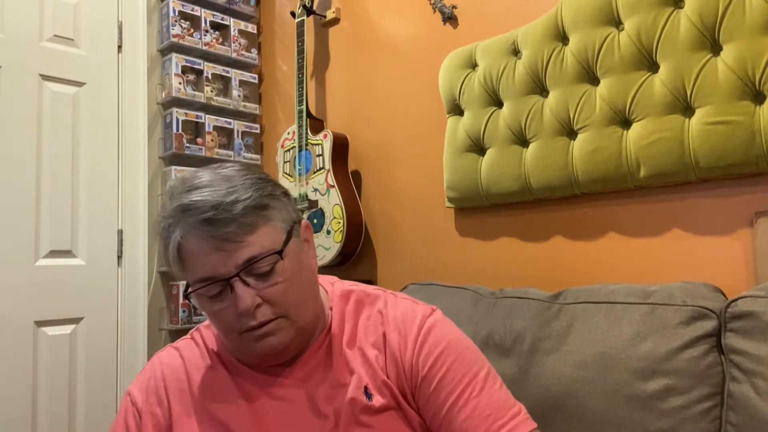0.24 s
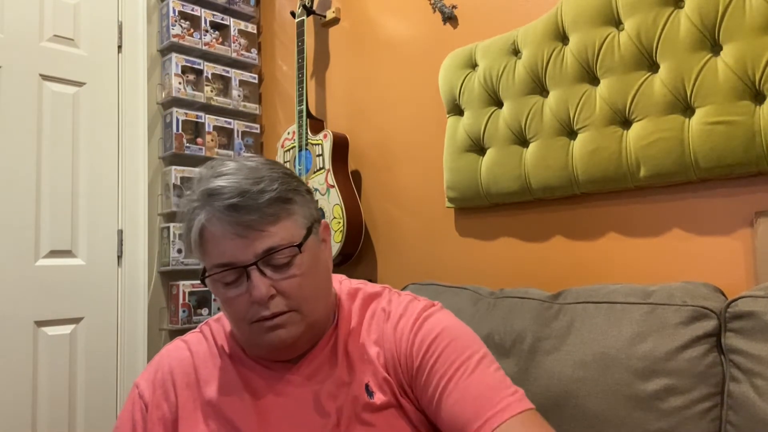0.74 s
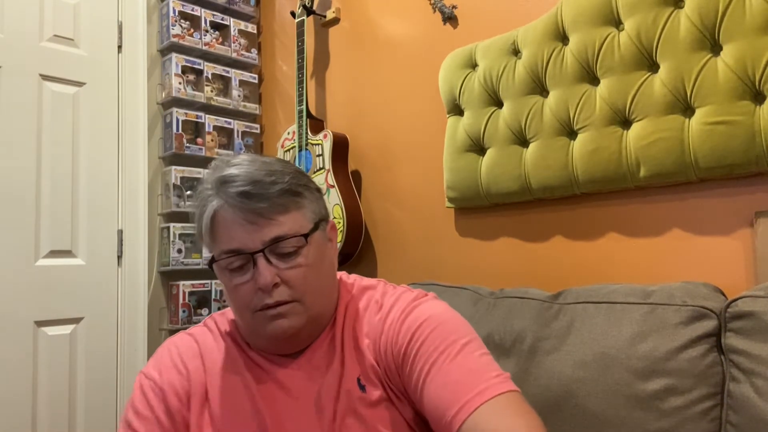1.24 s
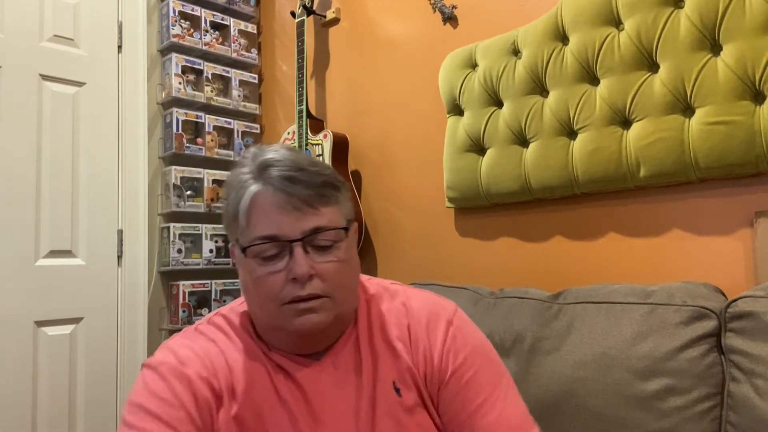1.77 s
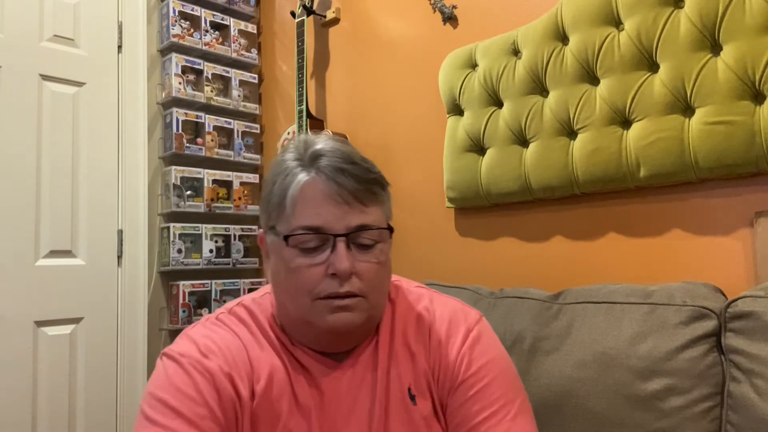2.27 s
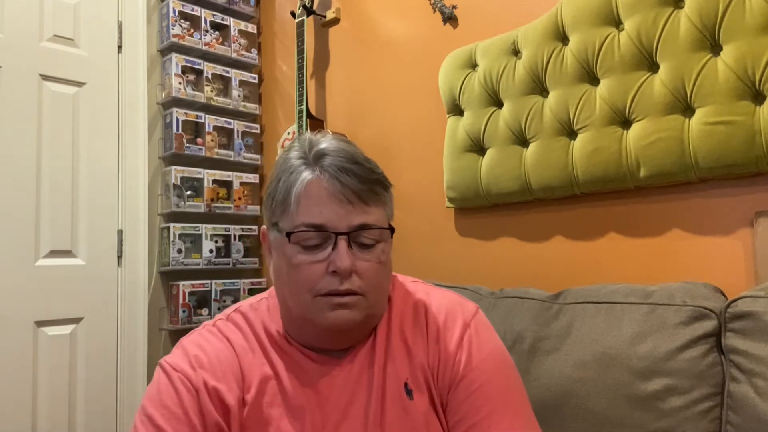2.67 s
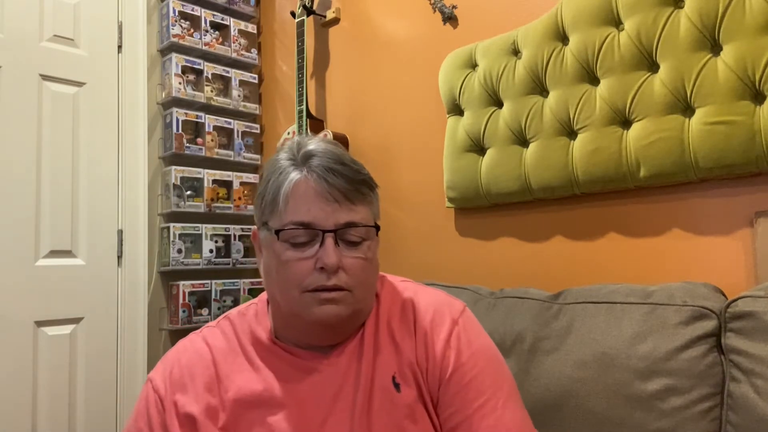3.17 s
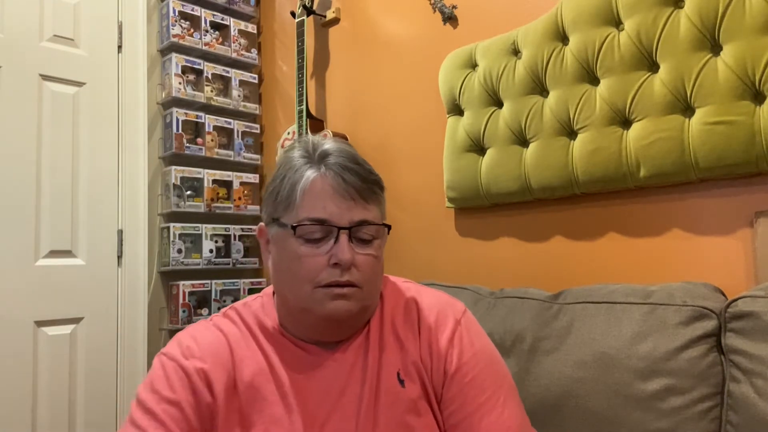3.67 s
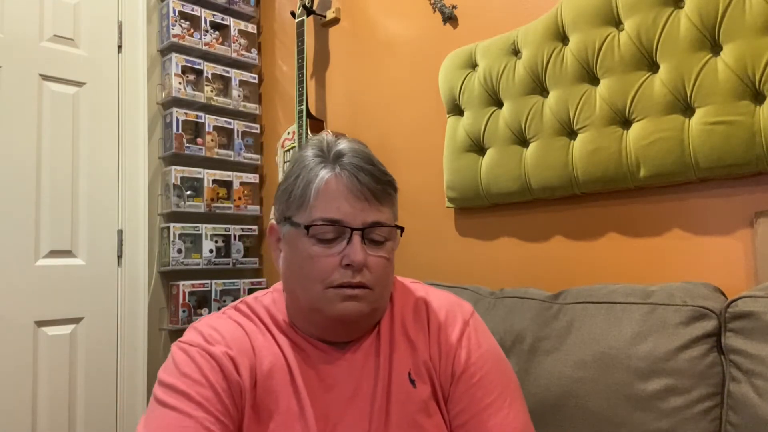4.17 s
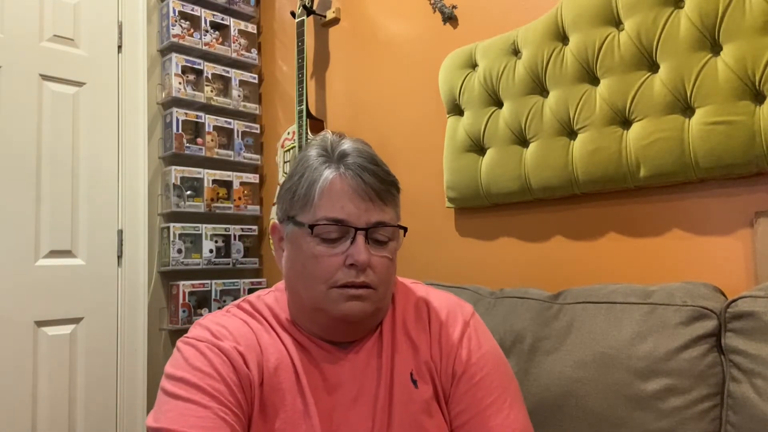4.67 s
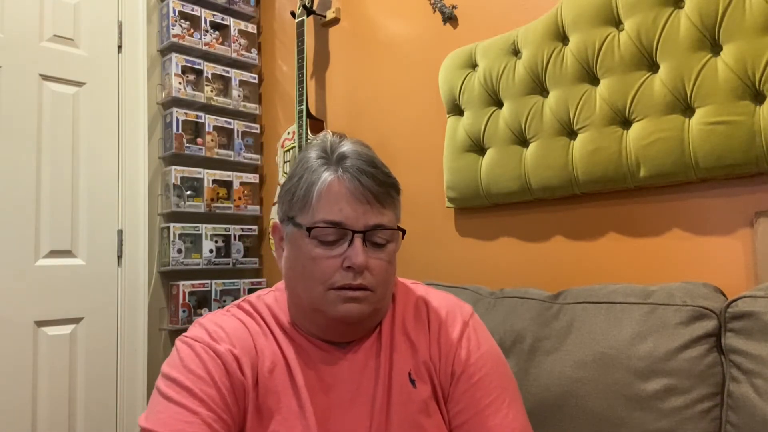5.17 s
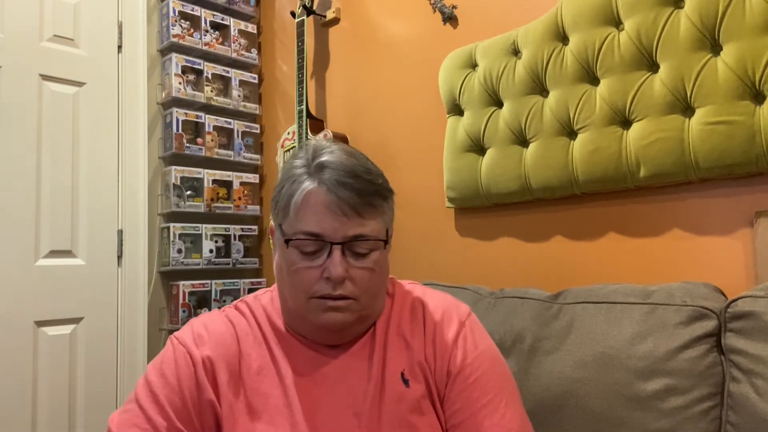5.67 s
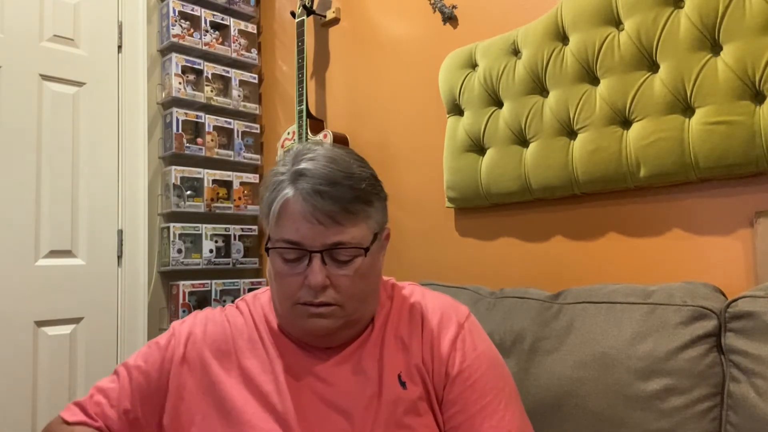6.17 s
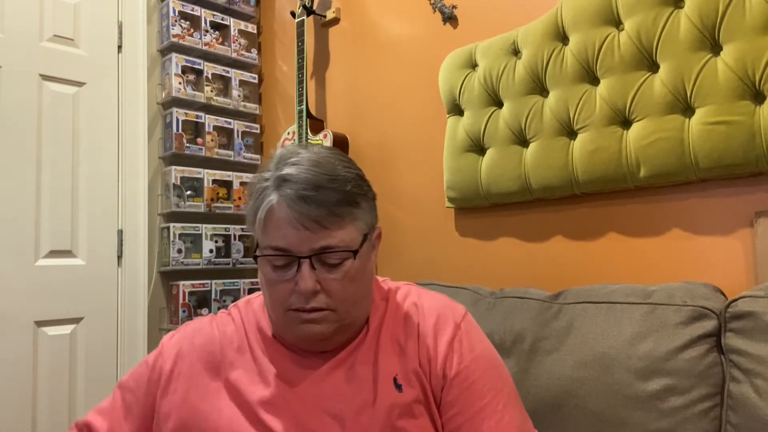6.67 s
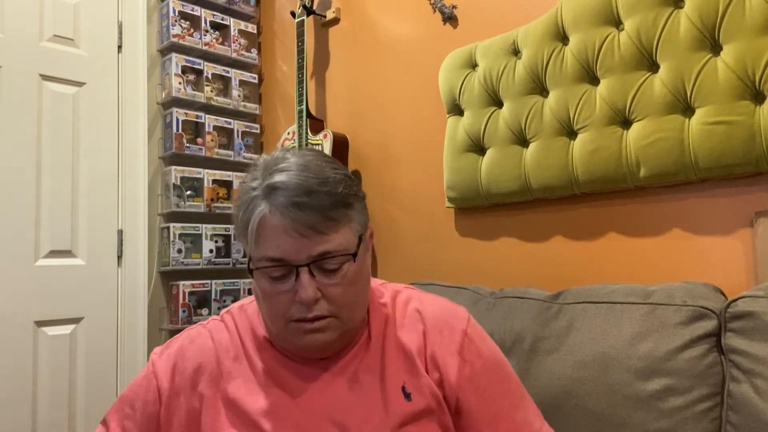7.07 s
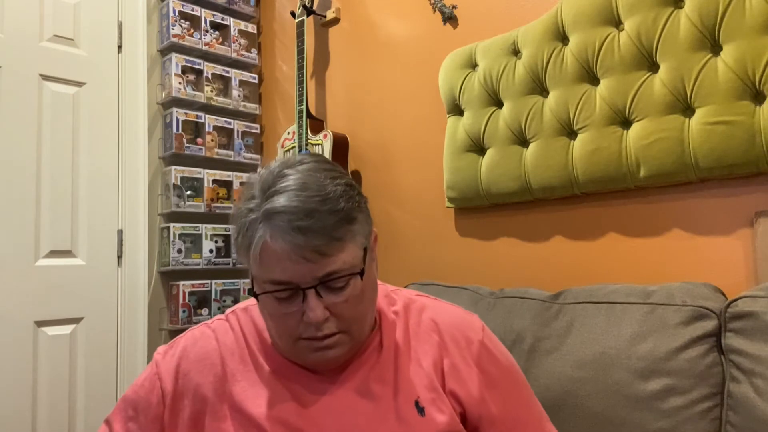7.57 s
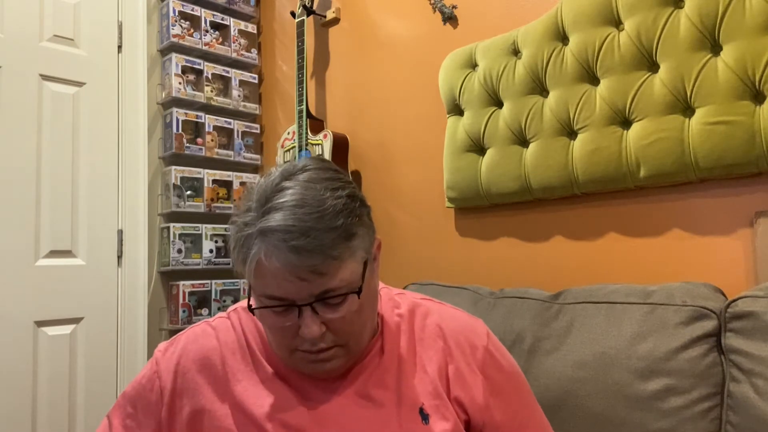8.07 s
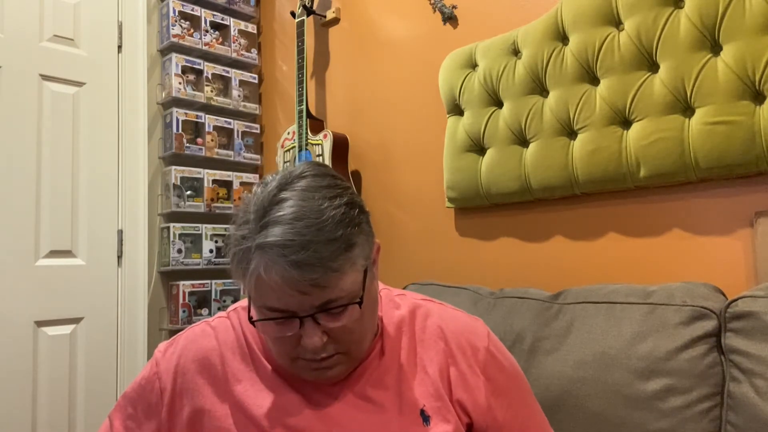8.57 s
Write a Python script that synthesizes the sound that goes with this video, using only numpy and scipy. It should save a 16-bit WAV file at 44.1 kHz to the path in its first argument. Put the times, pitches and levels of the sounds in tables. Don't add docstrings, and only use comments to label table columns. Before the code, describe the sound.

In a quiet furnished room, hands scrape and tap a cardboard box with papery rustles and dull thuds. After a quieter spell, packing tape tears away in one jerky, booming pull, pauses briefly, and releases with a sharp snap. Fingers then rub and drum lightly on the hollow board. A faint fan drones behind; the small stereo microphone is close.

```python
import sys
import numpy as np
from scipy import signal
from scipy.fft import rfft, irfft, next_fast_len
from scipy.io import wavfile

SR = 44100
rng = np.random.default_rng(int(sys.argv[2]) if len(sys.argv) > 2 else 0)


def voltage_ratio(level):
    return 10 ** (np.asarray(level, float) / 20)


def transcribe(u):
    v = np.clip(np.atleast_2d(u).T, -1, 1)
    q = np.round(v * 32767).astype(np.int16)
    wavfile.write(sys.argv[1], SR, q)


N = 389844
HZ = np.fft.rfftfreq(next_fast_len(N + SR // 2), 1 / SR) + 1e-3

# frequency in Hz, level in dB per Hz.
HISS_COLOUR = [(1800, -1), (2500, -1), (3300, 0.5), (4500, -1.5), (6000, -0.5), (8000, -15), (10000, -28.5)]
# frequency in Hz, level in dB per Hz.
SHEEN_COLOUR = [(4000, -39), (6000, -15), (8000, 0), (11000, 2.5), (14000, -3), (15500, -0.5)]
# start in seconds, peak in dB, thud in dB relative to the peak.
DRUMMING_TAPS = [(4.537, -69.5, 21.5), (4.625, -72.5, 24), (7.337, -45, -0.5), (7.425, -57.5, 10),
                 (7.469, -47.5, 7), (7.517, -49.5, 4.5), (7.553, -47.5, 6), (7.61, -47, 4.5),
                 (7.702, -45.5, 6.5), (7.717, -47, 7.5), (7.823, -48, 6), (7.869, -52, 12), (7.907, -52, 5),
                 (7.954, -51, 9.5)]


def rms_one(x):
    return x / np.sqrt(np.mean(x ** 2) + 1e-20)


def filtered(x, response):
    size = 2 * (len(HZ) - 1)
    return irfft(rfft(x, size) * response, size)[..., :N]


def shape(points):
    hz, db = np.transpose(points)
    return voltage_ratio(np.interp(np.log(HZ), np.log(hz), db))


def drift(rate):
    r = np.exp(-64 * np.pi * rate / SR)
    draws = rng.standard_normal(N // 32 + 1002)
    slow = signal.lfilter([1], [1, -2 * r, r * r], draws)[1000:]
    return np.interp(np.arange(N) / 32, np.arange(len(slow)), rms_one(slow))


def resonate(x, peaks):
    out = 0
    for k, (hz, width, db) in enumerate(peaks):
        r = np.exp(-np.pi * width / SR)
        a = [1, -2 * r * np.cos(2 * np.pi * hz / SR), r * r]
        b = np.array([1, 0, -1]) * (1 - r * r) / 2
        out = out + (-1) ** k * voltage_ratio(db) * signal.lfilter(b, a, x)
    return out


def moving(x, hz):
    turn = np.exp(2j * np.pi * np.cumsum(hz) / SR)
    lowpass = signal.butter(2, 140 / 2, fs=SR, output="sos")
    return rms_one(np.real(turn * signal.sosfilt(lowpass, x / turn)))


def band(x, low_hz, high_hz):
    return signal.sosfilt(signal.butter(2, [low_hz, high_hz], "band", fs=SR, output="sos"), x)


def patchy(x, edges_hz, patch_db, rate):
    masks = [(HZ >= low) & (HZ < high) for low, high in zip(edges_hz, edges_hz[1:])]
    return sum(part * voltage_ratio(patch_db * drift(rate)) for part in filtered(x, np.array(masks)))


def slips(per_s, spread_db, clump_db, smooth):
    sizes = voltage_ratio(spread_db * np.minimum(rng.exponential(1, N), 4)) * rng.choice([-1, 1], N)
    clicks = sizes * (rng.random(N) < per_s / SR)
    return (rms_one(clicks) + smooth * rng.standard_normal(N)) * voltage_ratio(clump_db * drift(25))


def strokes(rows, grip_db_per_s, let_go_db_per_s):
    t, power = np.arange(0, N + 32, 32) / SR, 1e-20
    for s, length, db, second_db in rows:
        loss_db = grip_db_per_s * np.maximum(s - t, 0) + let_go_db_per_s * np.maximum(t - s - length, 0)
        loss_db += 1 * np.maximum(t - s, 0)
        power = power + np.outer([1, voltage_ratio(second_db) ** 2], voltage_ratio(db - loss_db) ** 2)
    return np.array([np.interp(np.arange(N) / SR, t, np.sqrt(p)) for p in power])


def add(out, s, burst):
    i = round(s * SR)
    out[i:i + len(burst)] += burst[:N - i]


def force():
    # time in seconds, force on the board in dB, coupling into the hollow box in dB.
    pull_curve = [
        (5.085, -49.5, -3),
        (5.3, -47.5, 3),
        (5.47, -45, 3),
        (5.72, -45, 4),
        (5.79, -40, 9.5),
        (5.95, -41, 2),
        (6.06, -43.5, 1.5),
        (6.18, -47.5, -2.5),
        (6.323, -55.5, -9.5),
    ]
    s, db, box_db = np.transpose(pull_curve)
    t = np.arange(N) / SR
    slack_db = 900 * np.maximum(np.maximum(s[0] - t, t - s[-1]), 0)
    return np.interp(t, s, db) - slack_db, np.interp(t, s, box_db)


def pull():
    # frequency in Hz, width in Hz, level in dB.
    box_peaks = [(245, 41, 1), (310, 29, 4.5), (329, 66, 1)]
    # frequency in Hz, width in Hz, level in dB.
    board_peaks = [(453, 14, -6), (521, 50, 4.5), (600, 56, 7), (680, 76, 4.5), (909, 40, -9),
                   (893, 650, -12), (1270, 320, -2.5), (1533, 90, -4), (1800, 280, -8.5)]
    # start in seconds, peak in dB, pitch in Hz.
    big_slips = [(5.117, -35, 272), (5.286, -27.5, 211), (5.345, -34, 250), (5.365, -45, 250),
                 (5.437, -32, 248), (5.465, -33, 224), (5.554, -30.5, 300), (5.594, -25, 290),
                 (5.648, -36, 258), (5.68, -30, 301), (5.716, -24.5, 293), (5.753, -23, 259),
                 (5.776, -25, 300), (5.797, -15, 323), (5.82, -17, 308), (5.836, -23, 305),
                 (5.864, -19.5, 274), (5.908, -29, 310), (5.929, -18, 340), (5.952, -22.5, 330),
                 (5.97, -21, 305), (6.041, -26.5, 344)]
    # time in seconds, lower tone in Hz, upper tone in Hz, level in dB relative to the board.
    panel_tones = [(5.085, 1300, 1800, -25), (5.28, 1200, 1800, -12), (5.48, 1510, 1770, -3),
                   (5.56, 1260, 1750, -2), (5.79, 1420, 1800, 1.5), (6.03, 1590, 1970, 2),
                   (6.2, 1430, 1660, -6), (6.32, 1250, 1910, -15)]
    # frequency in Hz, width in Hz, level in dB.
    strip_peaks = [(2920, 180, -7), (3610, 170, 5), (4580, 1000, -2), (5040, 210, 6)]

    force_db, box_db = force()
    boom, board = voltage_ratio(-1 + force_db + box_db), voltage_ratio(force_db)
    hiss = voltage_ratio(-52.5 + 0.94 * (force_db + 44.0) - 0.6 * box_db)
    jerks = slips(500, spread_db=4.5, clump_db=1.0, smooth=0.55)
    fine = slips(1800, spread_db=3.5, clump_db=1.5, smooth=0.4)

    low = boom * rms_one(resonate(jerks, box_peaks))
    t = np.arange(round(0.041 * SR)) / SR
    for s, db, hz in big_slips:
        onset = (1 - np.exp(-t / 0.0026)) * 2.07
        add(low, s, voltage_ratio(db - 60 * t / 0.029) * np.sin(2 * np.pi * hz * t) * onset)

    mid = resonate(0.83 * jerks + fine, board_peaks)
    mid = patchy(mid, [20, 560, 800, 1150, 1600, 23000], patch_db=2.0, rate=9.5)
    s, *curves = np.transpose(panel_tones)
    lower_hz, upper_hz, tone_db = (np.interp(np.arange(N) / SR, s, c) for c in curves)
    both = jerks + fine
    tones = voltage_ratio(tone_db - 11) * (moving(both, lower_hz) + voltage_ratio(-4.5) * moving(both, upper_hz))

    top = filtered(fine, (shape(HISS_COLOUR) + voltage_ratio(-1.5) * shape(SHEEN_COLOUR)) * (HZ < 15900))
    top = patchy(top, [20, 2600, 3400, 4600, 5600, 7000, 23000], patch_db=1.5, rate=6.6)
    strip = resonate(fine, strip_peaks) * hiss ** 2 * voltage_ratio(1.8 * drift(22))
    tearing = hiss * (voltage_ratio(4.0) * rms_one(top) + voltage_ratio(-9.0) * rms_one(strip))
    return low + board * (rms_one(mid) + tones) + tearing


def snap():
    # start in seconds, level in dB.
    cracks = [
        (6.548, -10.5),
        (6.5535, -9.5),
    ]
    # pitch in Hz, level in dB, time to fall 60 dB in seconds, delay in seconds.
    box_modes = [(67, -21.5, 0.17, 0.0085), (91.4, -16, 0.12, .008), (118, -10.5, 0.057, 0.0084),
                 (244, -14, 0.024, 0.0023), (310, -23.5, 0.033, 0.0037), (385, -11.5, 0.025, 0.00098),
                 (460, -15.5, 0.057, 0.002), (484, -15, 0.079, 0.0011), (930, -19, 0.045, 0.00064),
                 (630, -6.5, 0.04, 0.00018), (670, -17.5, 0.0019, 0.012), (1762, -12, 0.03, .005)]
    out, t = np.zeros(N), np.arange(round(0.4 * SR)) / SR
    first_s = cracks[0][0]
    creak = rms_one(band(rng.standard_normal(len(t)), 300, 2300))
    creak = creak * voltage_ratio(-37.5 - 60 * t[::-1] / 0.049)
    add(out, first_s - len(t) / SR, creak)
    for s, db in cracks:
        noise = rng.standard_normal((4, len(t)))
        crack = voltage_ratio(-13.0 - 60 * t / 0.033) * rms_one(band(noise[0], 5700, 12000))
        crack += voltage_ratio(-17.0 - 60 * t / 0.02) * rms_one(band(noise[3], 5000, 5800))
        crack += voltage_ratio(-5.0 - 60 * t / 0.0068) * rms_one(band(noise[0], 13500, 18000))
        rattle = voltage_ratio(-20.0 - 60 * t / 0.073) * rms_one(band(noise[1], 220, 1500))
        boom = voltage_ratio(-17 - 60 * t / 0.25) * rms_one(band(noise[2], 180, 800))
        rustle = voltage_ratio(-27.0 - 60 * t / 0.29) * rms_one(band(noise[3], 1500, 8400))
        add(out, s, voltage_ratio(db) * (crack + rattle + boom + rustle))
    for hz, db, t60, after_s in box_modes:
        onset = 1 - np.exp(-t * hz / 0.56)
        add(out, first_s + after_s, voltage_ratio(db - 60 * t / t60) * np.sin(2 * np.pi * hz * t) * onset)
    return out


def handling():
    # start in seconds, length in seconds, scrape in dB, weight on the box in dB.
    rubs = [(.29, 0.019, -60, -23), (.34, 0.42, -62.5, -2.5), (.53, 0.0073, -52.5, -1),
            (.63, 0.27, -66, -8), (.94, 0.089, -55.5, 1), (1.1, 0.081, -56.5, -35), (1.27, 0.091, -57, -1),
            (1.44, 0.09, -55.5, -2), (1.6, 0.13, -54, -4), (1.83, 0.11, -53.5, -2.5),
            (1.97, 0.085, -57, -7), (2.06, 0.14, -53.5, -4), (2.15, 0.13, -56, -2),
            (2.3, 0.44, -65.5, -3.5), (2.77, 0.18, -61.5, 4), (3.07, 0.15, -55.5, -3.5),
            (3.35, 0.36, -73, -2), (3.79, 0.18, -63.5, 1), (4.11, 0.23, -66.5, 4), (4.71, 0.75, -72.5, 5),
            (4.94, 0.052, -56.5, -1), (6.335, 0.13, -66, 5), (6.68, 0.021, -63.5, 5.5),
            (6.81, .06, -61, -4.5), (6.9, 0.1, -57, -8), (7.03, 0.16, -59.5, 1), (7.24, 0.14, -62.5, 0.5),
            (7.47, 0.49, -76, 15), (8.11, .12, -77.5, 8.5), (8.25, 0.17, -70, 5), (8.5, 0.13, -70.5, -2),
            (8.67, .04, -70.5, -7), (8.41, 0.012, -60, 1.5), (8.72, 0.15, -61.5, 1.5)]
    # start in seconds, length in seconds, hiss in dB, sheen in dB relative to the hiss.
    brushes = [(-.03, 0.036, -65.5, -12), (.22, .05, -78, 5.5), (.283, 0.034, -57.5, -6),
               (.33, 0.17, -65, 3.5), (.535, 0.15, -56.5, -1.5), (.63, 0.28, -64, 1),
               (.583, 0.0033, -52, -1), (6.243, 0.0099, -60, -6), (.96, 0.13, -61, -2),
               (1.12, 0.4, -65.5, -3.5), (1.44, 0.095, -59, 3), (1.58, 0.067, -61.5, 3),
               (1.65, 0.058, -55, 4.5), (1.74, 0.11, -63.5, -3), (1.84, 0.042, -54, 5.5),
               (1.95, 0.14, -58.5, -1.5), (2.08, 0.11, -59, 2), (2.17, 0.047, -53, 0.5),
               (2.3, 0.94, -69, -1), (2.77, 0.16, -63.5, -2), (3.06, 0.029, -56.5, -0.5),
               (3.13, 0.16, -63, -6.5), (3.35, 0.13, -76.5, -7), (3.52, 0.1, -80, -2), (3.7, 0.025, -83, 3),
               (3.785, 0.24, -68.5, 1.5), (4.11, 0.088, -80.5, -3), (4.29, 0.073, -81, -11),
               (4.445, 0.027, -77.5, -12), (4.54, 0.15, -98, 6), (4.71, 0.047, -72, -16),
               (4.81, 0.14, -74.5, -9.5), (4.94, 0.4, -61, -1), (6.335, 0.019, -52.5, -5.5),
               (6.69, 0.19, -65.5, -7.5), (6.9, 0.082, -58.5, -2), (7.03, 0.25, -62, -4.5),
               (7.47, 0.17, -72, -1), (7.69, 0.076, -67, -5), (8.11, 0.11, -79.5, 0.5),
               (8.24, 0.061, -72.5, -2), (8.32, 0.09, -69, -3), (8.66, 0.044, -77, -3),
               (8.5, 0.26, -75, -1), (8.4, 0.064, -65, -6), (8.72, 0.15, -61.5, -5)]
    # frequency in Hz, level in dB per Hz.
    rubbed_colour = [(600, -3), (900, -3), (1250, 1), (1800, -2.5), (2300, -10), (3400, -25)]

    scuffs = [(s + 0.0052, 0.006, db - 17, -1.5) for s, db, thud_db in DRUMMING_TAPS]
    drags = [(s + 0.0052, 0.0052, db - 19, 11.5) for s, db, thud_db in DRUMMING_TAPS]
    scrape, rumble = np.hypot(strokes(rubs, 442, 165), strokes(drags, 1400, 600))
    brushing = np.hypot(strokes(brushes, 800, 210), strokes(scuffs, 1500, 900))
    hiss, sheen = brushing * voltage_ratio(1.3 * drift(9.0))
    pushes = np.hypot(voltage_ratio(-2.5) * rumble, voltage_ratio(-2 + force()[0]))

    low = slips(300, spread_db=2.8, clump_db=2.5, smooth=0.6)
    low = band(band(low, 150, 850), 150, 850)
    mid = filtered(slips(1200, spread_db=2.0, clump_db=2.0, smooth=0.93), shape(rubbed_colour))
    mid = patchy(mid, [20, 1150, 1600, 9000], patch_db=2.5, rate=11.0)
    fine = slips(3200, spread_db=-2.0, clump_db=0.9, smooth=0.98)
    top = filtered(fine, shape(HISS_COLOUR))
    top = patchy(top, [20, 2800, 4000, 5600, 23000], patch_db=1.5, rate=15.0)
    shine = filtered(fine, shape(SHEEN_COLOUR) * (HZ < 15900))
    heave = band(band(rng.standard_normal(N) * voltage_ratio(1.5 * drift(24.0)), 48, 145), 50, 450)
    surface = hiss * rms_one(top) + sheen * rms_one(shine)
    return rumble * rms_one(low) + scrape * rms_one(mid) + surface + pushes * rms_one(heave)


def taps():
    # start in seconds, peak in dB, thud in dB relative to the peak, thud pitch in Hz.
    single_taps = [(0.278, -42, 2, 358), (0.302, -42, -15, 183), (0.553, -33, -15, 150),
                   (1.279, -58.5, 16.5, 335), (1.63, -51.5, 13.5, 367), (1.871, -53, 9, 148),
                   (2.383, -58.5, 19, 158), (2.447, -38.5, -11, 157), (2.58, -40.5, 0.5, 614),
                   (2.773, -46, 1, 184), (2.836, -49, 11, 265), (2.8905, -39, 8.5, 331),
                   (3.467, -58.5, 15.5, 170), (3.633, -61.5, 19.5, 158), (3.777, -53, 6.5, 212),
                   (4.104, -60.5, 15.5, 204), (4.165, -55, 10.5, 346), (4.294, -47, 8.5, 655),
                   (4.379, -57.5, 13.5, 194), (4.483, -63, 14, 229), (4.701, -62, 21.5, 190),
                   (4.938, -37, -1.5, 321), (5.085, -52.5, 15, 310), (6.247, -51, -5, 686),
                   (6.3325, -30.5, 1.5, 508), (6.454, -53, -14.5, 676), (6.522, -43.5, 9, 402),
                   (6.909, -44, -3, 523), (4.985, -60, -1, 419), (8.391, -39.5, 0.5, 300)]
    panel_hz = 254
    rows = single_taps + [(*row, panel_hz) for row in DRUMMING_TAPS]
    out, t = np.zeros(N), np.arange(round(0.12 * SR)) / SR
    noise = rng.standard_normal((len(rows), len(t)))
    knocks = band(band(noise * voltage_ratio(-60 * t / 0.028), 450, 1500), 350, 2200)
    knocks /= np.abs(knocks).max(axis=1, keepdims=True)
    hollows = rms_one(band(noise, 150, 400))
    for (s, db, thud_db, hz), knock, hollow in zip(rows, knocks, hollows):
        ring_s = 0.053 * 300 / max(hz, 300) * voltage_ratio(0.35 * (db + thud_db + 45.0))
        thud = np.sin(2 * np.pi * hz * t) + 0.91 * hollow
        thud = thud * voltage_ratio(thud_db - 60 * t / ring_s) * (1 - np.exp(-t / 0.007))
        push_db = 10.5 + thud_db / 2 - 9 * np.log2(hz / 200)
        push = np.sin(2 * np.pi * 82 * t) * voltage_ratio(push_db - 60 * t / 0.016) * (1 - np.exp(-t / 0.0039))
        add(out, s, voltage_ratio(db) * (knock + 1.3 * thud + 0.59 * push))
    return out


def shoves():
    # start in seconds, level in dB.
    swings = [
        (0.552, -43.5),
        (1.871, -35.5),
        (2.385, -57),
        (3.799, -47),
        (4.706, -46),
        (5.191, -46),
        (6.33, -33),
        (7.563, -40),
        (7.729, -38),
        (7.888, -43.5),
    ]
    rise_s, swing_hz = 0.0063, 96
    out, t = np.zeros(N), np.arange(round(8 * rise_s * SR)) / SR
    swell = np.e * t / rise_s * np.exp(-t / rise_s)
    for s, db in swings:
        add(out, s, voltage_ratio(db) * swell * np.sin(2 * np.pi * swing_hz * t))
    return out


def rips():
    # start in seconds, peak in dB, pitch in Hz, time to fall 60 dB in seconds.
    rip_rows = [(0.285, -32.5, 1170, 0.044), (1.285, -54, 1270, .15), (1.476, -34, 910, 0.045),
                (2.16, -36, 654, 0.14), (2.8905, -25.5, 1580, 0.0082), (5.415, -49.5, 650, 0.09),
                (5.51, -29.5, 630, 0.069), (5.544, -27.5, 680, 0.056), (7.869, -41, 852, 0.032),
                (7.907, -46, 880, 0.027), (7.957, -56, 800, .04), (6.3318, -26.5, 2323, 0.077),
                (4.166, -50, 900, 0.024), (4.9128, -45, 1310, .03), (5.1292, -35, 1050, 0.05),
                (5.135, -40, 6500, .04), (5.207, -45, 1850, 0.036), (5.257, -33.5, 1180, 0.088),
                (5.314, -36.5, 1280, 0.053), (5.4585, -35.5, 1510, .05), (5.4605, -35, 654, 0.076),
                (5.489, -31.5, 1550, .04), (5.612, -32, 1270, 0.055), (5.6686, -39, 1300, .04),
                (5.7103, -31, 1360, .04), (5.7403, -42, 1350, .03), (5.7505, -32, 1800, 0.058),
                (5.778, -33, 4130, 0.088), (5.882, -37.5, 1800, 0.051), (5.945, -33, 4970, 0.085),
                (6.032, -32, 3020, 0.15), (6.033, -29.5, 2800, 0.1), (6.11, -29, 615, 0.15),
                (6.112, -36.5, 4130, .06), (6.113, -34, 3040, 0.067), (6.248, -38.5, 680, .05)]
    # start in seconds, peak in dB, colour in Hz.
    prick_rows = [(0.1296, -58, 9000), (0.149, -52, 12100), (0.217, -52, 11200), (0.226, -50, 11600),
                  (0.2598, -54, 11700), (0.5013, -45.5, 3140), (0.5377, -39, 7240), (2.7711, -52, 5120),
                  (3.0385, -43, 7100), (3.467, -59, 5700), (3.5259, -53, 3120), (3.7015, -68, 2620),
                  (3.7778, -55, 11900), (4.0195, -43, 2880), (4.1023, -45, 2990), (4.2183, -61, 3740),
                  (4.2433, -53, 2550), (4.2862, -57, 2520), (4.2996, -49, 2750), (4.4443, -63, 6110),
                  (4.4846, -56, 2980), (4.6952, -58, 6230), (4.714, -53, 2920), (4.9033, -48, 6020),
                  (6.77, -58, 11500), (6.829, -41, 6000), (6.8824, -39, 12200), (6.896, -48, 12500),
                  (6.9103, -34.5, 2140), (7.3142, -43, 6800), (7.3212, -38, 5900), (7.5172, -43.5, 5770),
                  (7.608, -42, 2280), (7.6904, -49, 2160), (7.869, -49, 2280), (7.907, -46, 2120),
                  (8.0361, -54, 6560), (8.05, -49, 8880), (8.1187, -64, 2283)]
    out, t = np.zeros(N), np.arange(round(0.08 * SR)) / SR
    for (s, db, hz, t60), noise in zip(rip_rows, rng.standard_normal((len(rip_rows), len(t)))):
        ring = resonate(noise * voltage_ratio(-60 * t / t60), [(hz, min(0.19 * hz, 380), 0)])
        add(out, s, voltage_ratio(db - 5.5) * ring / np.abs(ring).max())
    prick_fade = voltage_ratio(-60 * t / 0.0062) + 0.033 * voltage_ratio(-60 * t / 0.062)
    for (s, db, hz), noise in zip(prick_rows, rng.standard_normal((len(prick_rows), len(t)))):
        noise = band(noise * prick_fade, 1800, 15000)
        prick = 0.25 * noise + resonate(noise, [(hz, 0.41 * hz, 0)])
        add(out, s, voltage_ratio(db - 4.5) * prick / np.abs(prick).max())
    return out


def ticks():
    # start in seconds, peak in dB, colour in Hz.
    tick_rows = [(0.2872, -29, 3230), (0.5285, -36, 10000), (0.5544, -20.5, 10900), (0.5848, -30.5, 11800),
                 (0.302, -39, 3500), (2.4438, -43.5, 7090), (2.8905, -53, 3500), (4.7274, -45.5, 6120),
                 (4.94, -24, 6300), (4.985, -37.5, 4710), (5.078, -35.5, 5010), (5.4612, -31, 4990),
                 (5.8833, -28, 4850), (6.3307, -19, 6400), (6.455, -37, 3610), (6.5476, -6.5, 6270),
                 (6.7085, -34.5, 4900), (7.3375, -33.5, 3300), (7.471, -55, 5770), (7.5524, -42, 4900),
                 (7.715, -44, 3000), (7.7573, -38, 6300), (7.7775, -36, 5660), (7.8233, -36, 5660),
                 (7.8452, -40, 6130), (7.905, -49, 6270), (7.9225, -40, 4470), (7.9559, -44.5, 3540),
                 (8.0602, -48, 6720), (8.3914, -41.5, 3020)]
    out, t = np.zeros(N), np.arange(round(0.047 * SR)) / SR
    cracks = rms_one(band(rng.standard_normal((len(tick_rows), len(t))), 2200, 15000))
    fade = voltage_ratio(-60 * t / 0.008) + 0.042 * voltage_ratio(-60 * t / 0.062)
    for (s, db, hz), crack in zip(tick_rows, cracks):
        crack = 0.6 * crack + 1.8 * resonate(crack, [(hz, 2600, 0)])
        crack = crack * fade
        add(out, s, voltage_ratio(db - 3.5) * crack / np.abs(crack).max())
    return out


def pops():
    # start in seconds, peak in dB, pitch in Hz, time to fall 60 dB in seconds.
    pop_rows = [(2.8937, -28, 339, 0.031), (2.936, -44, 403, 0.042), (4.166, -51, 890, 0.014),
                (5.4605, -31.5, 646, 0.035), (6.2485, -36, 680, .03), (6.7065, -39, 3030, .004),
                (6.7091, -28, 4900, .004), (7.554, -45, 900, 0.011), (7.7775, -48, 5550, .004),
                (7.8455, -45, 3500, 0.0045), (7.9075, -40, 890, 0.013), (7.957, -41, 803, .015),
                (8.3925, -42.5, 700, 0.023), (5.36, -41, 600, 0.042), (6.16, -42, 646, .05)]
    out, t = np.zeros(N), np.arange(round(0.08 * SR)) / SR
    for s, db, hz, t60 in pop_rows:
        onset = 1 - np.exp(-2 * t * hz)
        add(out, s, voltage_ratio(db + 2.5 - 60 * t / t60) * np.sin(2 * np.pi * hz * t) * onset)
    return out


def room_tone():
    # frequency in Hz, level in dB per Hz.
    air_colour = [(15, -55), (25, 9), (110, 9), (161, -3), (199, -2.5), (598, -22), (855, -52), (1170, -44),
                  (2390, -38.5), (7500, -40), (9750, -72.5), (16500, -63)]
    # frequency in Hz, width in Hz, level in dB.
    fan_tones = [(104.9, 6.1, -63), (197.1, 4.1, -71)]
    out = voltage_ratio(-59) * rms_one(filtered(rng.standard_normal(N), shape(air_colour)))
    for hz, width, db in fan_tones:
        out = out + voltage_ratio(db) * rms_one(resonate(rng.standard_normal(N), [(hz, width, 0)]))
    return out


def echoes(t60, gap_s):
    t = np.arange(SR // 2) / SR
    cloud = rng.standard_normal(len(t)) * voltage_ratio(-60 * t / t60) * (t >= gap_s)
    return rfft(cloud / np.sqrt(np.sum(cloud ** 2)), 2 * (len(HZ) - 1))


def scene():
    # frequency in Hz, side level minus middle level in dB.
    width_curve = [(60, -10.5), (130, -10.5), (290, -12), (640, -4.5), (1400, -4.5), (2400, 0), (4400, -1),
                   (8000, 1.5)]
    dry = pull() + handling() + taps() + shoves() + rips() + ticks() + pops() + room_tone()
    mid = filtered(dry, 1 + voltage_ratio(-10) * echoes(0.3, gap_s=0.0067))
    central = snap()
    near = np.array([echoes(0.044, gap_s=0) for path in range(2)])
    paths = filtered(mid + 0.4 * central, near)
    turn = np.cumsum(drift(20)) * 2 * np.pi * 40 / SR
    mid = mid + central
    side = filtered(paths[0] * np.cos(turn) + paths[1] * np.sin(turn), shape(width_curve)) + 0.046 * mid
    return np.array([mid + side, mid - side])


def band_limit(x):
    return signal.sosfilt(signal.butter(12, 16830, fs=SR, output="sos"), x)


def record(dry):
    treble_hz, treble_lag_s, in_step_hz = 6600, 1.82e-4, 12000
    treble = 1 / (1 + (treble_hz / HZ) ** 24)
    treble = treble * shape([(15800, 0), (15960, -24), (16700, -30), (17200, -80)])
    half_lag = np.pi * (HZ - in_step_hz) * treble_lag_s
    common = np.cos(half_lag) * shape([(14000, 0), (14400, -6), (15000, -6), (15250, -3)])
    late = -(common + 1j * np.sin(half_lag) * np.array([[1], [-1]]))
    x = filtered(dry, 1 / (1 + (HZ / treble_hz) ** 24))
    x = x + voltage_ratio(3.5) * filtered(dry.mean(axis=0), treble * late)
    x = signal.sosfilt(signal.butter(4, 48, "high", fs=SR, output="sos"), x)
    return band_limit(x)


dry = scene()
out = record(dry)
transcribe(out)
```